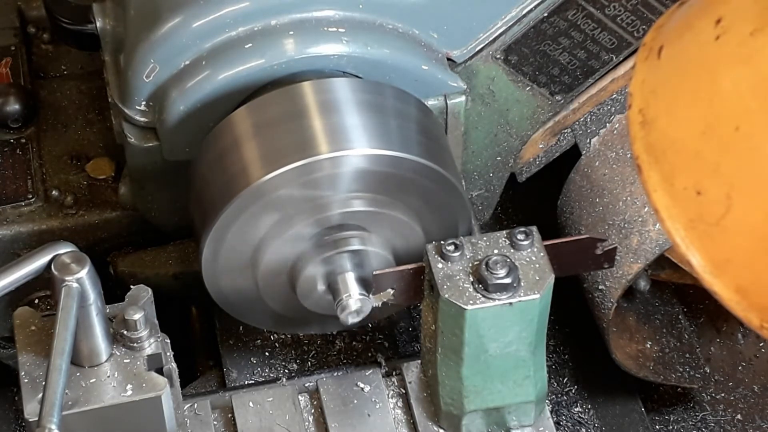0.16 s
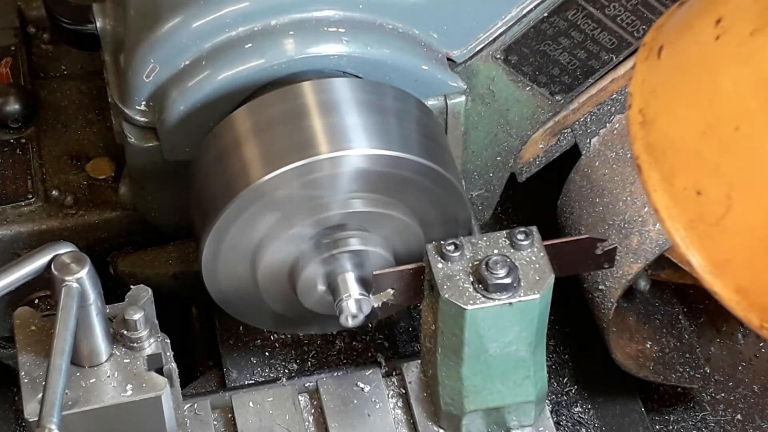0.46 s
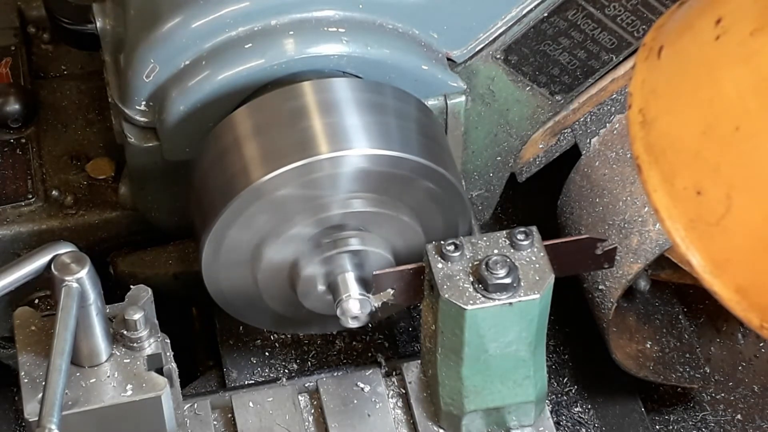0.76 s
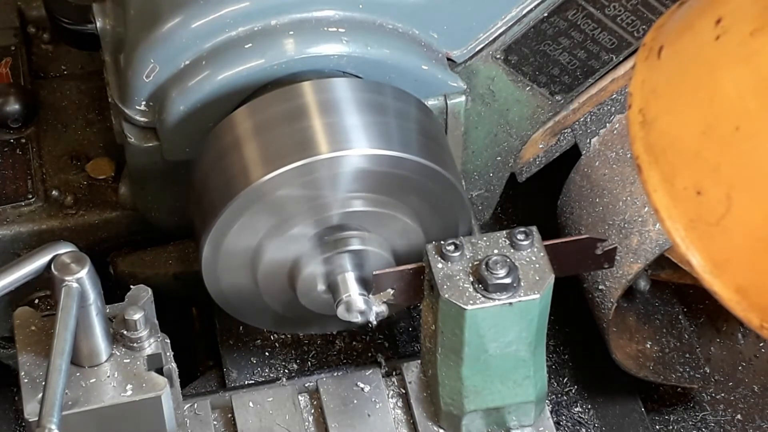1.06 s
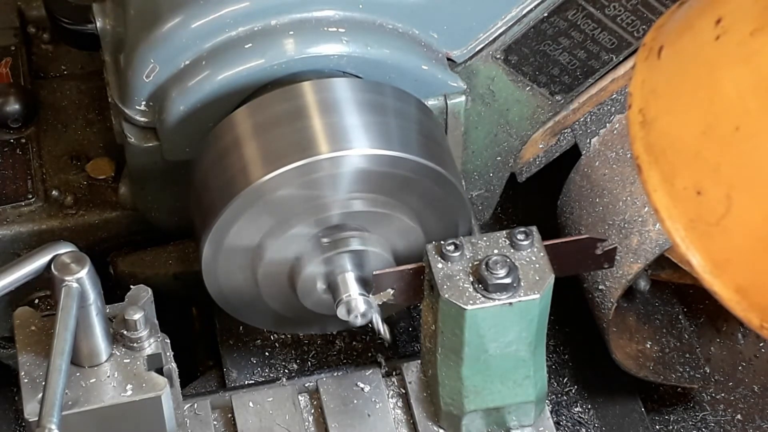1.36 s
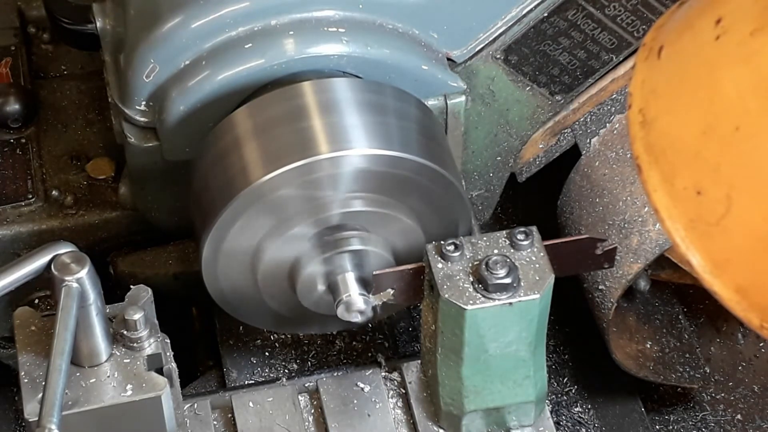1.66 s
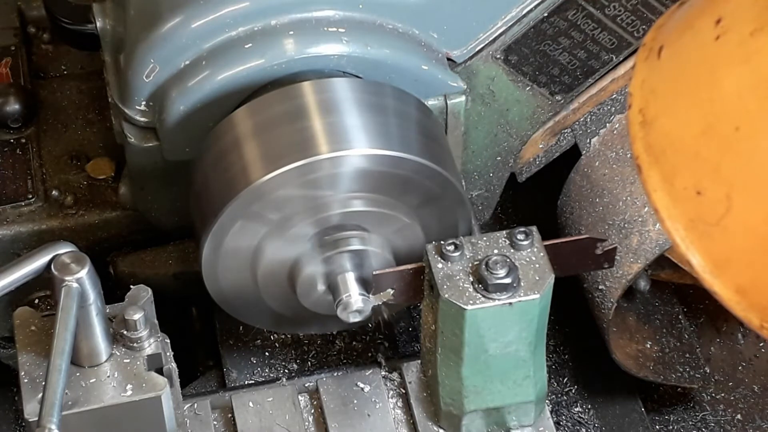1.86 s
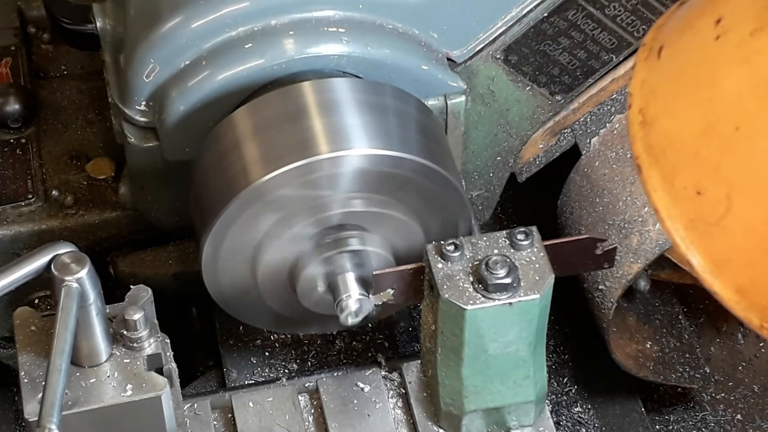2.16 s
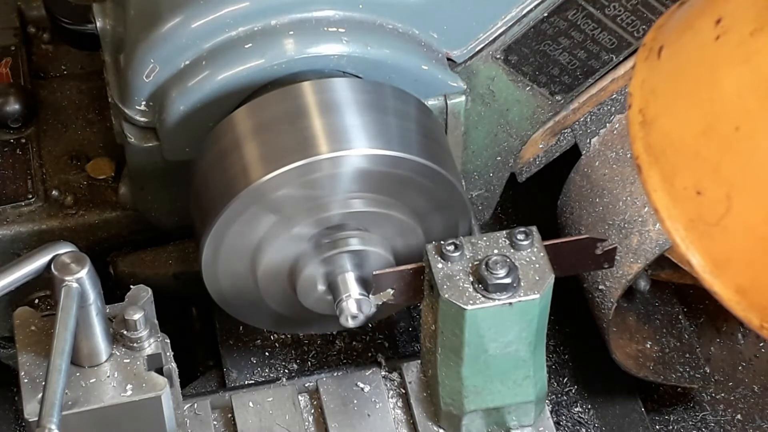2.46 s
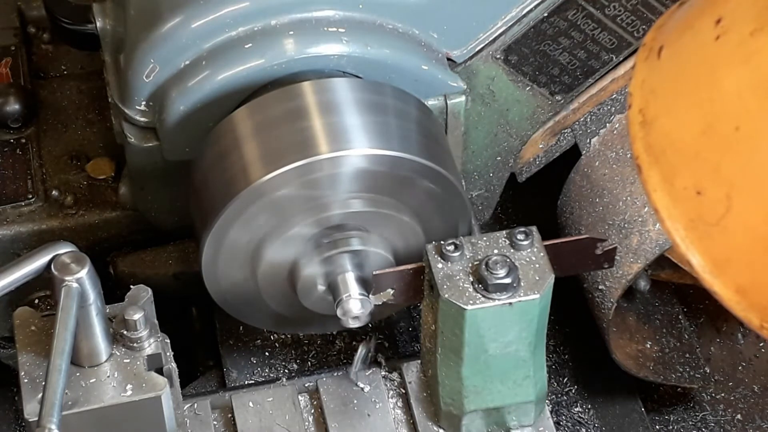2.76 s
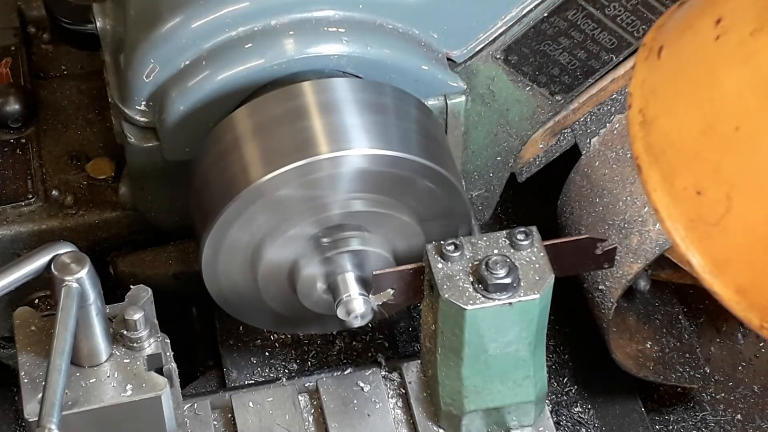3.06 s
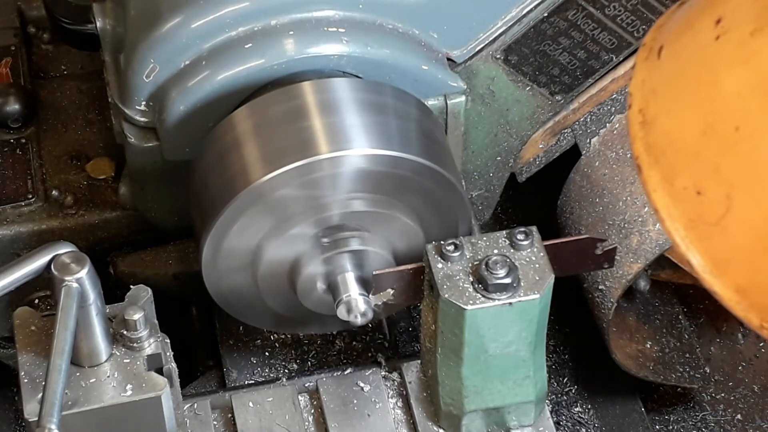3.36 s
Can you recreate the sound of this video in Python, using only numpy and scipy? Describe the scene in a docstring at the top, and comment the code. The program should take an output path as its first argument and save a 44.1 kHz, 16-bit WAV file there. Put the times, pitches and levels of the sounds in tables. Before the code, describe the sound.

A metal lathe runs throughout with a steady, ringing hiss of gears and bearings and a faint motor hum. From the start until about 0.8 seconds, its blade chatters against spinning steel in short buzzes, roughly ten a second, with one soft bump near 0.5 seconds. The buzzing returns from 1.4 to 2 seconds, then more faintly from 2.7 to 3.2 seconds.

```python
"""Cutting a groove on a small lathe

A metal lathe runs steadily in a home workshop while a blade is fed into a spinning steel bar.
Gears and bearings hiss through the ringing metal body, the motor hums, and the bench bumps once.
About ten times a second, once a turn, the high side of the bar makes the blade chatter
in short buzzes that swell and fade with the feed."""
import sys
import numpy as np
from scipy import signal
from scipy.fft import rfft, irfft
from scipy.io import wavfile
from scipy.ndimage import uniform_filter1d

SR = 44100
rng = np.random.default_rng(int(sys.argv[2]) if len(sys.argv) > 2 else 0)


def waveform_to_disk(signal):
    """Save audio, clipped to [-1, 1], as 16-bit WAV at the path in sys.argv[1]."""
    frames = np.transpose(np.atleast_2d(signal))
    scaled = np.clip(frames, -1, 1) * 32767
    samples = np.round(scaled).astype(np.int16)
    wavfile.write(sys.argv[1], SR, samples)


N = 154350

# Tone colour of the running noise: f/Hz, relative level/dB
HISS_COLOUR = [(40, -22), (80, -5), (110, -5), (210, -11.5), (330, -5.5), (600, -7), (1100, -7),
               (2450, -14), (3300, -9.5), (4700, -12.5), (6800, -10.5), (8000, -14.5), (9500, -29.5),
               (10600, -22.5), (11500, -14.5), (14300, -21), (15700, -20.5)]
# Moments when the hiss dips briefly: centre t/s, half-width/s, depth/dB
HISS_DIPS = [(.657, .006, 18), (.700, .006, 18), (1.213, .005, 16), (2.172, .007, 16)]
# Resonances of the cast body (bed and headstock): f/Hz, relative width/Hz, relative level/dB
BODY_RINGS = [(312.8, 24, 5), (414.6, 14, -1.5), (543, 29, 1.5), (595, 32, 2), (721, 24, -1), (900, 64, -2),
              (1017, 29, 5.5), (1053.3, 18, 7), (1175, 26, -1.5), (1212, 37, 3.5), (1347, 37, 2.5),
              (1587, 78, -1.5), (1874, 70, 1), (2027, 65, -4), (2150, 21, -7.5), (2277, 44, -7.5),
              (2460, 83, -13.5), (2632, 31, -10), (2862, 47, -7), (2906, 110, -10)]
# Resonances of the spindle and the chuck that grips the bar: f/Hz, relative width/Hz, relative level/dB
CHUCK_RINGS = [(3265, 25, -14), (3360, 20, 0), (3415, 22, -2), (3462, 30, -1), (3535, 40, -11),
               (3615, 70, -6), (3880, 50, -14)]
# Resonances of bearings and small parts: f/Hz, relative width/Hz, relative level/dB
BEARING_RINGS = [(4860, 40, -16), (4960, 45, -11), (5200, 80, -17), (5560, 90, -11), (5740, 70, -8),
                 (5815, 60, -5), (5890, 60, -8), (5965, 50, -9), (6170, 90, -16), (6350, 50, -13),
                 (6560, 40, -13), (6980, 120, -14), (7400, 120, -16), (11030, 70, -18), (11260, 60, -18),
                 (11460, 110, -6), (11680, 50, -15), (12070, 90, -22), (13290, 70, -20), (13680, 90, -17),
                 (13880, 60, -22), (14920, 120, -24), (15390, 90, -23)]
# Load on the machine: t/s, overall level/dB, extra chuck level/dB, extra bearing level/dB
# Only each level's swing around its own average is used.
LOAD_CURVES = [(0, -45.5, -6.5, -2.5), (.3, -47.5, -8, -2.4), (.7, -47.5, -6, 1), (1.1, -47.5, -6.5, 0.9),
               (1.5, -47.5, -5.5, 0.8), (1.9, -47.5, -6.5, .1), (2.23, -46.5, -3.5, 0.5),
               (2.5, -48, -6.5, 0.4), (2.88, -47.5, -6, -0.1), (3.2, -48.5, -6, 0.6),
               (3.5, -46.5, -8, -1.5)]
# Tones of motor and belt: f/Hz, rms level/dB, wander/dB
MOTOR_TONES = [(99.8, -68.5, 3.5), (73.3, -80, 4), (85, -72, 5), (273, -79.5, 7.5)]
# Buzzes of the blade: centre t/s, rise time/s, peak level/dB, f/Hz,
# 2nd harmonic level/dB, 3rd harmonic level/dB
BLADE_BUZZES = [(0.063, 0.017, -36, 338, -52, -35), (0.09, 0.011, -44, 350, -50, -47),
                (0.132, 0.009, -46, 370, -59, -46), (0.158, 0.016, -32, 343, -43.5, -33.5),
                (0.232, 0.0069, -42.5, 376, -52, -47.5), (0.256, 0.013, -30, 346, -43.5, -33),
                (0.28, 0.0087, -48, 352, -45, -41), (0.339, 0.013, -39, 340, -45, -43),
                (0.355, 0.014, -34.5, 347, -52, -45), (0.382, 0.007, -44, 383, -50, -48.5),
                (0.441, 0.02, -37, 348, -47, -39.5), (0.454, 0.0047, -35.5, 370, -45, -40),
                (0.479, 0.0081, -43, 354, -50, -47), (0.54, 0.024, -37.5, 334, -50.5, -43.5),
                (0.632, 0.016, -38, 333, -50, -48), (0.729, 0.022, -44.5, 328, -58, -74),
                (0.821, 0.0093, -51, 332, -62, -63), (1.392, 0.012, -46.5, 340, -62, -49),
                (1.455, 0.009, -47, 336, -71, -59), (1.487, 0.009, -40, 360, -57, -46),
                (1.557, 0.0065, -38, 360, -59, -49), (1.585, 0.01, -41.5, 368, -54, -49),
                (1.655, 0.013, -37, 360, -53, -49), (1.679, 0.0073, -39, 374, -53, -49),
                (1.753, 0.018, -40.5, 360, -59, -48), (1.854, 0.02, -44.5, 342, -60, -57),
                (1.951, 0.027, -48, 346, -72, -64), (2.714, 0.011, -51.5, 336, -65, -65),
                (2.813, 0.01, -43.5, 344, -68, -55), (2.909, 0.015, -41, 331, -71, -57),
                (2.98, 0.018, -52, 340, -65, -47), (3.004, 0.015, -39, 335, -62, -57),
                (3.076, 0.0051, -47, 356, -64, -56), (3.101, 0.013, -42, 330, -64, -57),
                (3.193, 0.027, -51, 329, -59, -64)]


def amp(db):
    """Turn decibels into a gain."""
    return 10 ** (np.asarray(db) / 20)


def rms_one(x):
    """Scale a signal so that its average strength (rms) is 1."""
    return x / np.sqrt(np.mean(x ** 2) + 1e-20)


def drift(rate_hz):
    """A slow random wander of strength 1 that changes about rate_hz times a second."""
    r = np.exp(-2 * np.pi * rate_hz / SR)
    warm_up = SR // 4
    wander = signal.lfilter([1], [1, -2 * r, r * r], rng.standard_normal(N + warm_up))
    return rms_one(wander[warm_up:])


def resonate(x, hz, width_hz):
    """Make a signal ring: pitches near hz pass, the rest are weakened."""
    r = np.exp(-np.pi * width_hz / SR)
    gain = (1 - r * r) / 2
    return signal.lfilter([gain, 0, -gain], [1, -2 * r * np.cos(2 * np.pi * hz / SR), r * r], x)


def dips_db():
    """Short, bell-shaped drops in level."""
    t = np.arange(N) / SR
    return -sum(depth_db * np.exp(-((t - at) / width) ** 2) for at, width, depth_db in HISS_DIPS)


def running_noise(level_db=-50.5, ripple_db=2.2, ripple_step_hz=40):
    """Gears, belt and motor hiss and rumble; countless small resonances make the colour uneven."""
    hz, db = np.transpose(HISS_COLOUR)
    f = np.maximum(np.arange(N // 2 + 1) * SR / N, 1)
    ripple = np.interp(f / ripple_step_hz, np.arange(2000), rng.standard_normal(2000))
    colour_db = np.interp(np.log(f), np.log(hz), db) + ripple_db * ripple
    bass_cut = np.minimum(f / hz[0], 1) ** 2
    hiss = irfft(rfft(rng.standard_normal(N)) * amp(colour_db) * bass_cut, N)
    return amp(level_db + dips_db()) * rms_one(hiss)


def ringing_metal(rings, level_db, dip_below_db, widen=1.3, flicker_db=1.04):
    """Rolling parts make the metal ring. Each ring flickers on its own; weak ones dip with the hiss."""
    warm_up = 4000
    rolling = rng.standard_normal((3, N + warm_up))  # neighbouring rings get unrelated noise
    metal, dips = 0, dips_db()
    for k, (hz, width_hz, db) in enumerate(rings):
        ring = resonate(rolling[k % 3], hz, widen * width_hz)
        ring = resonate(ring, hz, widen * width_hz)[warm_up:]  # a second pass sharpens the edges
        ring_db = db + flicker_db * drift(20) + dips * (db < dip_below_db)
        metal += amp(ring_db) * ring
    return amp(level_db) * rms_one(metal)


def machine_noise(turns_per_s=10.52, throb_db=1.6):
    """Hiss and ringing follow the load; the high ringing throbs three times a turn, once per chuck jaw."""
    t = np.arange(N) / SR
    times, *curves = np.transpose(LOAD_CURVES)
    load_db, chuck_db, bearing_db = [np.interp(t, times, db - db.mean()) for db in curves]
    bearing_db += throb_db * np.cos(2 * np.pi * (3 * turns_per_s * t - .3))
    chuck = amp(chuck_db) * ringing_metal(CHUCK_RINGS, level_db=-52, dip_below_db=-4)
    bearings = amp(bearing_db) * ringing_metal(BEARING_RINGS, level_db=-52, dip_below_db=-8)
    body = ringing_metal(BODY_RINGS, level_db=-54, dip_below_db=3)
    flicker_db = 0.54 * drift(27)
    return amp(load_db + flicker_db) * (running_noise() + body + chuck + bearings)


def motor_hum():
    """Motor and belt give steady low tones that waver in strength."""
    t = np.arange(N) / SR
    hum = 0
    for hz, db, wander_db in MOTOR_TONES:
        strength = np.sqrt(2) * amp(db + wander_db * drift(rate_hz=4))
        hum += strength * np.sin(2 * np.pi * (hz * t + rng.random()))
    return hum


def bench_bump(at_s=.471, hz=136, gain_db=-38.5, rise_s=0.0046, fade_s=0.062):
    """One soft bump on the bench: a low tone that dies away by 60 dB in fade_s."""
    t = np.maximum(np.arange(N) / SR - at_s, 0)
    rise = 1 - np.exp(-t / rise_s)
    return amp(gain_db - 60 * t / fade_s) * rise * np.sin(2 * np.pi * hz * t)


def swell(t, rise_s, tail=1.31):
    """The bell-shaped loudness of a buzz; the fall takes tail times as long as the rise."""
    return np.exp(-2 * (t / (rise_s * np.where(t > 0, tail, 1))) ** 2)


def blade_scrape(tearing, post_hz, rub_s=.12):
    """Tearing steel scrapes and rings the tool post; rubbing keeps the post singing between buzzes."""
    rub_strength = amp(7) * uniform_filter1d(tearing, size=int(rub_s * SR))
    rub = rub_strength * rng.standard_normal(N)
    band = signal.butter(2, [426, 2100], "band", fs=SR, output="sos")
    scrape = tearing * rms_one(signal.sosfilt(band, rng.standard_normal(N)))
    post_ring = amp(6) * resonate(scrape + rub + 1e-18, post_hz, width_hz=29)
    return scrape + post_ring


def blade_chatter(sag_hz_per_s=580, post_hz=1048, post_pull=0.59, scrape_db=-19.5):
    """The blade shakes against the bar: each buzz is a falling tone with overtones and a scrape."""
    tones, tearing = np.zeros((2, N))
    phases = rng.random((len(BLADE_BUZZES), 4 + 1))[:, :4]
    for (at, rise_s, db, hz, second_db, third_db), phase in zip(BLADE_BUZZES, phases):
        span = np.arange(max(int((at - .06) * SR), 0), min(int((at + .08) * SR), N))
        t = span / SR - at
        cycles = np.outer([1, 2, 3, 4], hz * t - sag_hz_per_s * t ** 2 / 2)
        # The tool post, which holds the blade, pulls the 3rd harmonic towards its own pitch.
        cycles[2] += post_pull * (post_hz - 3 * hz) * t
        first, second, third, fourth = np.sin(2 * np.pi * (cycles + phase[:, None]))
        upper = third + amp(-14.5) * fourth
        tones[span] += amp(db) * swell(t, rise_s) * first
        tones[span] += amp(second_db) * swell(t - 0.0023, rise_s) * second  # peaks a little later
        tones[span] += amp(third_db) * swell(t + 0.0053, 0.84 * rise_s) * upper  # earlier and shorter
        tearing[span] += amp(db + scrape_db) * swell(t, 1.56 * rise_s)
    return tones + blade_scrape(tearing, post_hz)


def scene():
    """Mix machine noise, hum, bump and chatter into one channel."""
    return (machine_noise() + motor_hum() + bench_bump() + blade_chatter())[None]


def record(dry):
    """Cut the treble steeply above 15750 Hz."""
    return signal.sosfilt(signal.ellip(12, .5, 60, 15750, fs=SR, output="sos"), dry)


dry = scene()
out = record(dry)
waveform_to_disk(out)
```